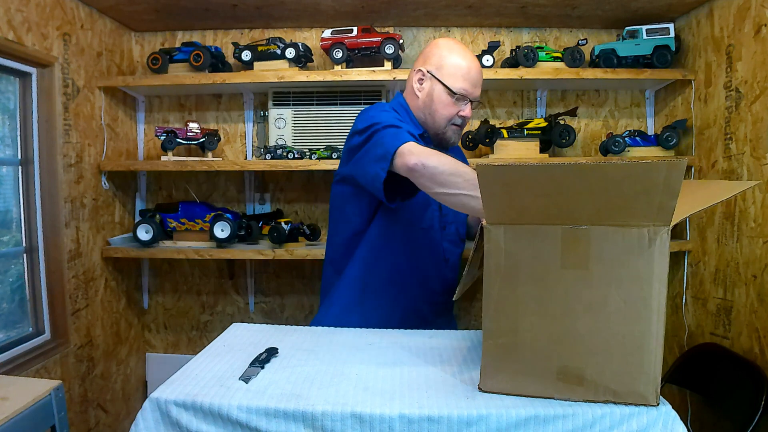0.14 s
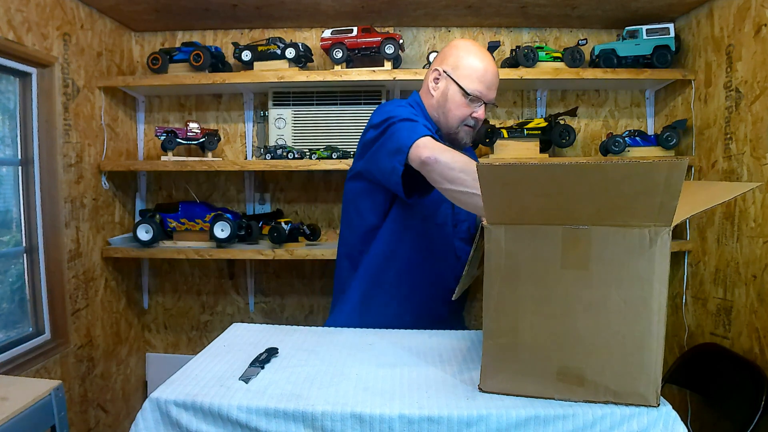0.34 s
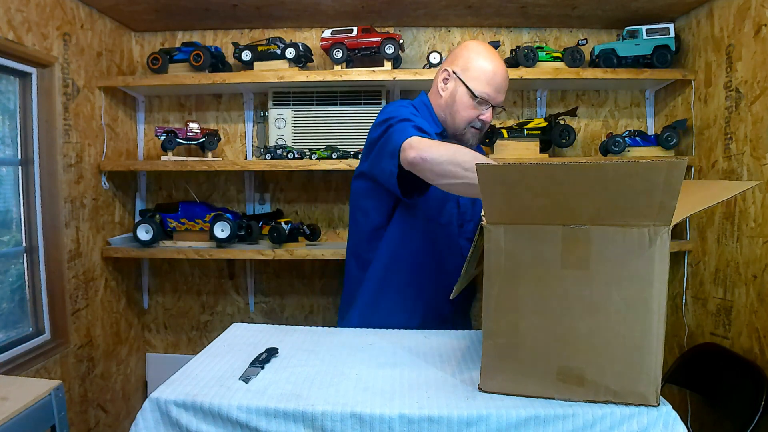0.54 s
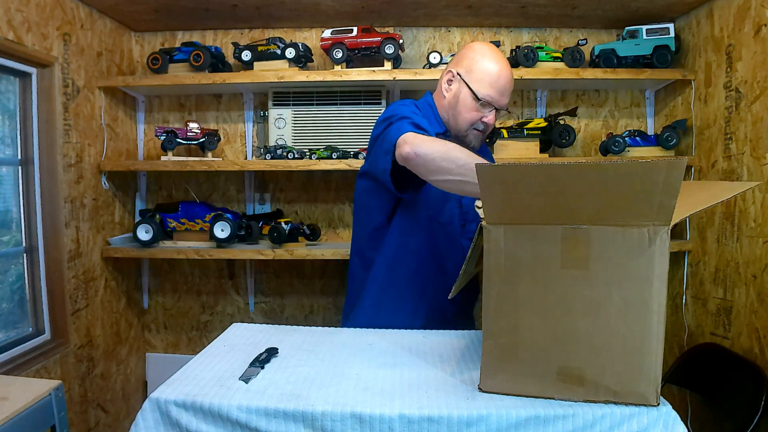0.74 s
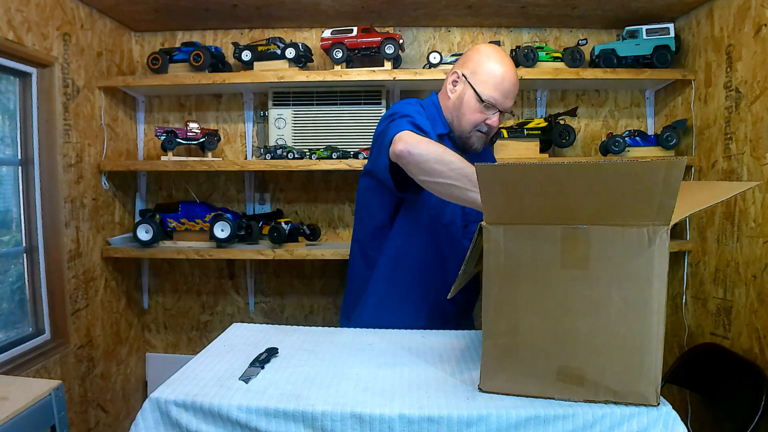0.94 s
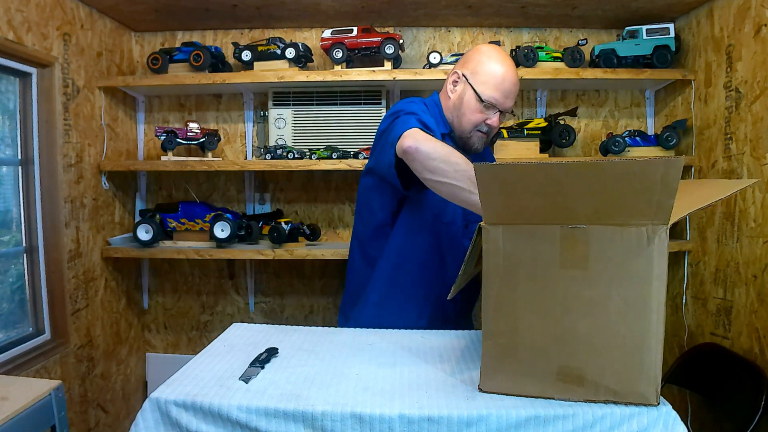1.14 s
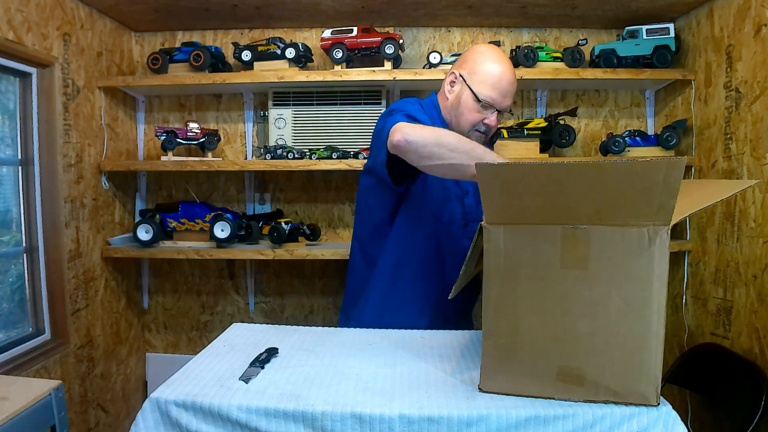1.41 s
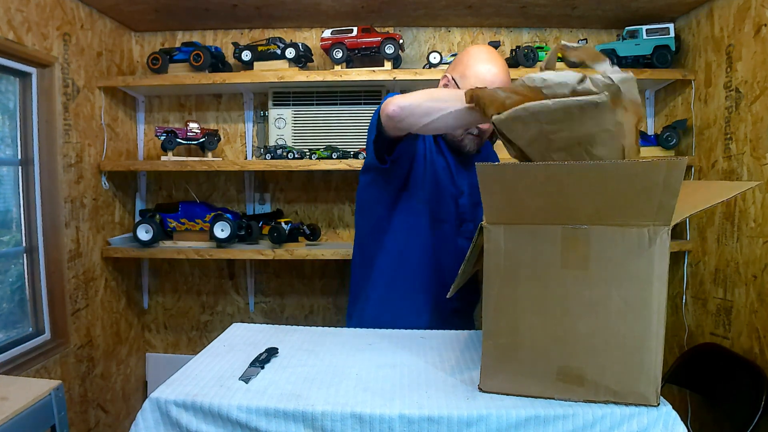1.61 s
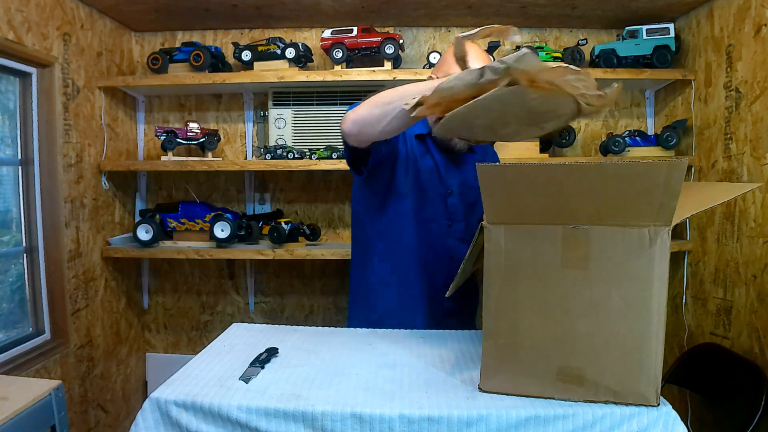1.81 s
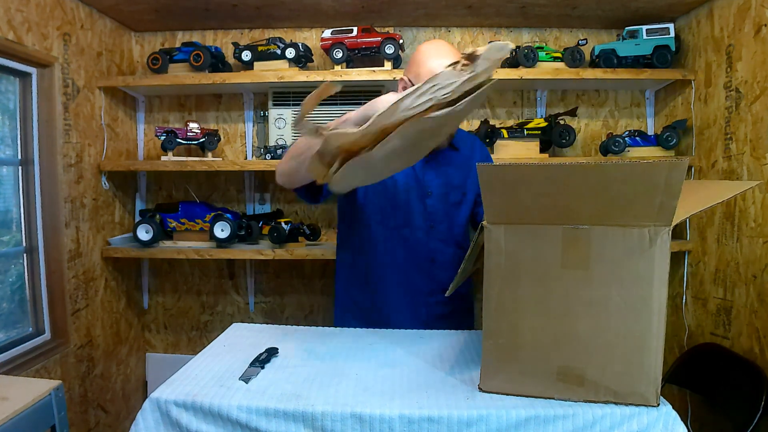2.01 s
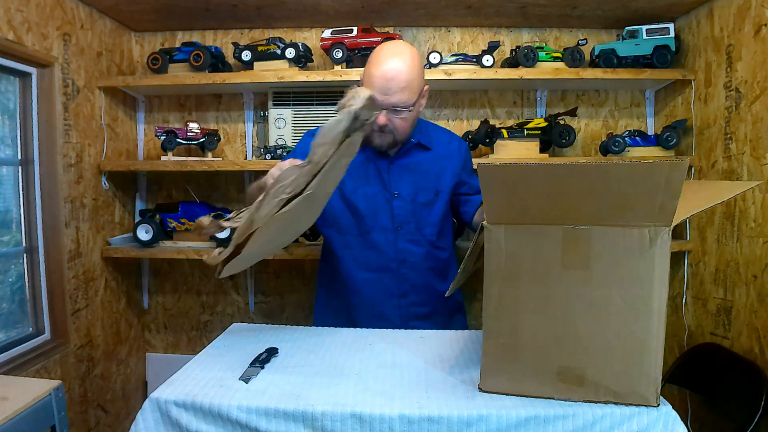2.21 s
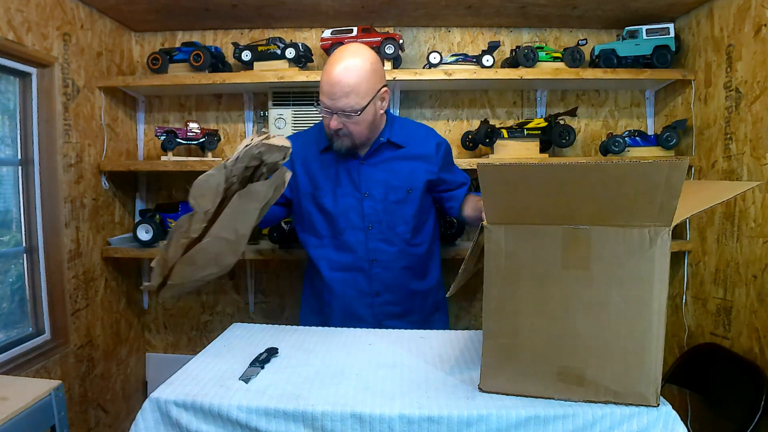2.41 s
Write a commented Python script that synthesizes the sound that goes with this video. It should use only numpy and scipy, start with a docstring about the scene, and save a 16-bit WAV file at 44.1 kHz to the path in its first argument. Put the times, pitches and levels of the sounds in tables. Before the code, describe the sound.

Stiff paper rustling in bursts inside a hollow cardboard box, then a soft box thump

```python
"""In a small wooden room, brown packing paper is gathered inside a cardboard box and dragged out.
Tiny buckling creases, drawn as filtered random clicks, ring in the box; a few noise bursts snap louder.
The loose sheet flaps softly in swells of clicks, one of them heard as a faint low knock, and slaps
together in a dense crackle with a thin hiss. Soft hollow knocks on the box are sums of decaying modes.
One microphone stands some way off."""
import sys
import numpy as np
from scipy import signal
from scipy.fft import rfft, irfft
from scipy.io import wavfile

SR = 44100
rng = np.random.default_rng(int(sys.argv[2]) if len(sys.argv) > 2 else 0)


def waveform_to_disk(signal):
    """Save audio, clipped to [-1, 1], as 16-bit WAV at the path in sys.argv[1]."""
    frames = np.transpose(np.atleast_2d(signal))
    scaled = np.clip(frames, -1, 1) * 32767
    samples = np.round(scaled).astype(np.int16)
    wavfile.write(sys.argv[1], SR, samples)


N = 112454


def amp(db):
    """Level definition: a gain is ten to the power of decibels over twenty."""
    return 10 ** (np.asarray(db) / 20)


def unit(x):
    """Normalisation: equal mean power, scaled to rms 1."""
    return x / np.sqrt(np.mean(x ** 2) + 1e-20)


def read(points, hz):
    """Interpolation of a spectrum along a logarithmic frequency axis."""
    f, value = np.transpose(points)
    return np.interp(np.log(hz + 1), np.log(f + 1), value)


def add(mix, s, sound):
    """Superposition: a sound is summed into the mix from time s."""
    part = mix[max(round(s * SR), 0):][:len(sound)]
    part += sound[:len(part)]


def bins(size=8192):
    """Discrete Fourier frequencies on which the colours are drawn."""
    return np.fft.rfftfreq(size, 1 / SR)


def colour(x, db):
    """Minimum-phase filtering: folding the cepstrum makes a causal filter with the given dB at each bin."""
    cepstrum = irfft(np.log(amp(np.maximum(db, db.max() - 100))))
    half = len(cepstrum) // 2
    cepstrum[1:half] *= 2
    cepstrum[half + 1:] = 0
    response = irfft(np.exp(rfft(cepstrum)))[:half]
    return signal.fftconvolve(x, response)[:len(x)]


def above(hz, edge_hz, order=6):
    """Crossover: a smooth weight that rises from 0 to 1 across the edge."""
    return 1 - 1 / (1 + (hz / edge_hz) ** order)


def resonance_db(hz, width_hz, lift_db):
    """Resonance: a bell in dB, with half its lift at the edges of its width."""
    return lift_db / (1 + (2 * (bins() - hz) / width_hz) ** 2)


def tint(depth_db, count=26):
    """Random radiation: the chance colour of one facet of paper."""
    return read(np.c_[np.geomspace(150, 11000, count), depth_db * rng.standard_normal(count)], bins())


def creases(size, per_s):
    """Random pulse process: the buckling creases are many tiny clicks and a few large ones."""
    spread_db = 4.5
    chance, strength, sign = rng.random((3, size))
    level_db = spread_db * np.minimum(-np.log(1 - strength), 3.8)
    return (chance < per_s / SR) * np.sign(sign - .5) * amp(level_db)


def echoes(room_db, size=16384):
    """Reverberation: direct sound, quick box echoes, then the decaying room; new for each place."""
    # Decay of the room. Each row: frequency in Hz, t60 in seconds.
    room_decay = [(100, 0.38), (400, 0.25), (1000, 0.37), (3000, 0.31), (10000, 0.16)]
    box_echo_db, box_decay_s = 2.5, 0.008
    t = np.arange(size) / SR
    sparse = rng.random((2, size)) < 3000 / SR
    taps = rng.standard_normal((2, size)) * sparse * (t > .001)
    near = taps[0] * np.exp(-t / box_decay_s)
    # the room fades at its own rate in each band
    hz, at, z = signal.stft(taps[1] * (t > .005), SR, nperseg=256)
    fade = amp(-60 * at / read(room_decay, hz)[:, None])
    far = signal.istft(z * fade, SR, nperseg=256)[1][:size]
    out = (t == 0) + amp(box_echo_db) * near / np.linalg.norm(near) + amp(room_db) * far / np.linalg.norm(far)
    return out / np.linalg.norm(out)


def burst(drive, colour_db, room_db, span_s):
    """Energy scaling: a coloured burst in the room, with the energy of 0 dB held for span_s."""
    sound = colour(signal.fftconvolve(drive, echoes(room_db)), colour_db)
    return sound / np.linalg.norm(sound) * np.sqrt(span_s * SR)


def room_tone():
    """Stationary filtered noise: the faint steady air of the room."""
    # Spectrum of the air. Each row: frequency in Hz, relative level in dB.
    air = [(20, 2), (35, -12), (70, -11.5), (215, -22.5), (475, -25.5), (800, -28.5), (1250, -30.5),
           (2000, -39), (3200, -43), (6000, -44.5), (8000, -48), (11000, -46.5)]
    level_db = -68.5
    spectrum = rfft(rng.standard_normal(N)) * amp(read(air, np.fft.rfftfreq(N, 1 / SR)))
    return amp(level_db) * unit(irfft(spectrum, N))


def flaps():
    """Resonant bursts: short swells of clicks with one ring each, as flaps and one faint low knock."""
    # Flaps of the loose sheet, and one faint low knock (at 1.976 s). Each row: start in seconds,
    # level in dB, treble lift in dB, time scale of the swell in seconds, pitch of the ring in Hz,
    # lift of that ring in dB.
    flap_rows = [(0.0, -77.5, 4, 0.0034, 1250, 7), (1.815, -54.5, -0.5, 0.0069, 1415, 18),
                 (1.839, -47, -4.5, 0.0032, 820, 21), (1.893, -58.5, -1.5, 0.0061, 1207, 19),
                 (1.954, -61, 8.5, 0.0074, 900, 5.5), (1.976, -71, -10, 0.0087, 376, 31),
                 (2.329, -68, -7.5, 0.0083, 1390, 14.5), (2.422, -72.5, 12.5, 0.0044, 2840, 16)]
    # Colour shared by these bursts. Each row: frequency in Hz, relative level in dB.
    sheet = [(60, -31), (300, -11.5), (550, -12), (820, -2.5), (1300, -4), (1800, -11), (2400, -10),
             (3200, -27.5), (4300, -15.5), (5000, -26.5), (5900, -13.5), (7500, -39), (11000, -47)]
    ring_width_hz, treble_edge_hz, tint_db, room_db, span_s = 210, 3330, 3.5, -6, 0.027
    out, t = np.zeros(N), np.arange(4096) / SR
    for s, db, treble_db, swell_s, ring_hz, ring_db in flap_rows:
        sheet_db = read(sheet, bins()) + treble_db * above(bins(), treble_edge_hz)
        colour_db = sheet_db + resonance_db(ring_hz, ring_width_hz, ring_db) + tint(tint_db)
        swell = t ** 2 * np.exp(-(t / swell_s) ** 0.99)
        add(out, s, amp(db) * burst(creases(len(t), 3000) * swell, colour_db, room_db, span_s))
    return out


def paper_db(detune=0):
    """Cavity resonance: the open box colours the paper; detune is a relative shift of its resonances."""
    # Colour of the paper. Each row: frequency in Hz, relative level in dB.
    paper = [(40, -39.5), (100, -25.5), (150, -13), (200, -15.5), (300, -4.5), (400, -2.5), (630, -4),
             (950, -5.5), (1270, 3), (1750, -10.5), (2400, -11.5), (3050, -22), (3900, -14.5),
             (5000, -17.5), (5900, -17), (6700, -26), (7500, -38.5), (8800, -34.5), (11000, -41.5)]
    # Resonances of the open box. Each row: frequency in Hz, width in Hz, lift in dB.
    hollow = [(155, 7.3, 2), (387.8, 17, 5.5), (535, 24, 0), (636, 41, 8.5), (838, 180, 4), (1020, 17, 7),
              (1257, 95, 0), (1390, 150, 0)]
    lifts = [resonance_db(hz * (1 + detune), width_hz, lift_db) for hz, width_hz, lift_db in hollow]
    return read(paper, bins()) + sum(lifts)


def sway(hold_s):
    """Low-rate random process: a slow drift between chance values hold_s apart."""
    return np.interp(np.arange(N) / SR / hold_s, np.arange(256), rng.standard_normal(256))


def crackle(count=14):
    """Incoherent sources: facets with their own colour and echoes take turns at crackling and sliding."""
    creases_per_s, slide_share, tint_db, room_db = 1900, 0.24, 3.5, 3.5
    swing_db, hold_s, box_shift = 2, .07, 0.021
    share = amp([swing_db * sway(hold_s) for _ in range(count)])
    facets = []
    for detune in np.linspace(-box_shift, box_shift, count):
        drive = unit(creases(N, creases_per_s / count)) + slide_share * rng.standard_normal(N)
        facet = colour(drive, paper_db(detune) + tint(tint_db))
        facets.append(unit(signal.oaconvolve(facet, echoes(room_db))[:N]))
    return (share * facets).sum(0) / np.linalg.norm(share, axis=0)


def rustle():
    """Crackling noise in bands: broad folds give the bass, small creases the treble."""
    # Handling of the paper, one table per move. Each row: time in seconds, then the levels in dB
    # of the middle, the bass and the treble, before the trim of each band.
    grab = [(0.17, -98, -96, -104), (0.212, -39, -63, -47), (0.24, -40, -56, -54.5),
            (0.278, -48, -62.5, -57.5), (0.314, -54.5, -52, -62.5), (0.335, -51.5, -69, -58)]
    gather = [(0.344, -50, -62, -52), (0.369, -38.5, -39.5, -45), (0.393, -32.5, -36, -47),
              (0.417, -34.5, -37, -40.5), (0.461, -39, -47, -48), (0.469, -36.5, -39.5, -49),
              (0.528, -38.5, -51.5, -41), (0.561, -39, -46, -46), (0.575, -38, -47.5, -46),
              (0.613, -39, -49, -45.5), (0.673, -37, -43, -47), (0.705, -42, -53.5, -51),
              (0.762, -38, -41, -47), (0.789, -44.5, -44, -52), (0.885, -44, -64, -59)]
    tug = [(0.9, -48.5, -59, -56.5), (0.929, -40, -45.5, -47), (0.964, -36, -51, -50),
           (0.995, -35, -44, -44.5), (1.029, -35, -43.5, -48), (1.059, -46, -63, -53),
           (1.096, -43.5, -40, -57), (1.115, -56, -51, -62), (1.14, -57, -61, -72.5)]
    drag = [(1.175, -49.5, -49, -59), (1.186, -35.5, -60, -45.5), (1.245, -35.5, -44, -46.5),
            (1.277, -34.5, -38.5, -45.5), (1.317, -35, -41.5, -47.5), (1.335, -40, -57, -51.5),
            (1.385, -35, -47.5, -52), (1.443, -36, -45, -46.5), (1.479, -39.5, -46, -53),
            (1.497, -38, -52.5, -51), (1.536, -35, -43, -48), (1.595, -40, -45, -48.5),
            (1.631, -46.5, -51, -55.5)]
    lift = [(1.637, -52, -40.5, -50), (1.66, -45, -44, -52.5), (1.672, -34, -49.5, -51.5),
            (1.722, -44.5, -51, -48.5), (1.75, -55, -66, -58.5), (1.774, -43.5, -60, -54.5),
            (1.81, -69, -70.5, -73.5)]
    # Gain of the highest treble. Each row: time in seconds, gain in dB.
    fizz_gain = [(.22, -6), (.31, -2), (.38, 6), (.48, 0.5), (.7, 5), (.88, -1), (1.02, 2), (1.09, -7.5),
                 (1.2, 3.5), (1.36, -2), (1.47, -2), (1.59, 5.5), (1.75, 5.5)]
    trims_db = [-1.5, -0.7, -0.24]  # middle, bass, treble
    bass_edge_hz, treble_edge_hz, fizz_edge_hz, settle_db_per_s = 478, 2010, 6660, 271.5

    sound = rfft(crackle())
    hz, t = np.fft.rfftfreq(N, 1 / SR), np.arange(N) / SR
    s, *levels = np.transpose(np.vstack([grab, gather, tug, drag, lift]))
    # the level falls away before the first row and after the last
    rest_db = -settle_db_per_s * abs(t - np.clip(t, s[0], s[-1]))
    low, high = above(hz, bass_edge_hz), above(hz, treble_edge_hz)
    out = np.zeros(N)
    for band, level, trim_db in zip([low - high, 1 - low, high], levels, trims_db):
        level_db = np.interp(t, s, level) + trim_db + rest_db
        out += unit(irfft(sound * band, N)) * amp(level_db)
    fizz = irfft(rfft(out) * above(hz, fizz_edge_hz, order=24), N)
    return out + fizz * (amp(np.interp(t, *np.transpose(fizz_gain))) - 1)


def snaps():
    """Snap-through buckling: a stiff crease gives way at once, a broad fold low, a small one high."""
    # Single loud creases. Each row: start in seconds, level in dB, pitch in Hz,
    # fall to either side of the pitch in dB per octave.
    snap_rows = [(0.209, -46.5, 2400, 0), (0.224, -42.5, 770, 6), (.260, -55.5, 4350, 16),
                 (.302, -54.5, 4170, 39), (.329, -52.5, 3930, 21), (.359, -39, 414, 21.5),
                 (.380, -36, 345, 18.5), (.394, -31.5, 420, 6.5), (.406, -33, 1300, 4),
                 (.420, -42.5, 4400, 6), (.487, -35, 1410, 0), (.533, -33, 1300, -1.5),
                 (.572, -37.5, 690, 23), (.654, -41, 1230, 10), (0.713, -42, 810, 22),
                 (.984, -31.5, 1080, 8), (.993, -42.5, 4700, 7.5), (1.032, -46.5, 5650, 8.5),
                 (1.178, -41.5, 1300, 7), (1.187, -37, 4220, 3.5), (1.22, -49, 3650, 21.5),
                 (1.284, -54.5, 4500, 10), (1.319, -36, 1220, 10), (1.348, -35.5, 1280, 7),
                 (1.394, -40.5, 1250, 4), (1.495, -46.5, 4200, 15.5), (1.527, -37.5, 500, 4),
                 (1.638, -35.5, 830, 21.5), (1.666, -40, 785, 10), (1.732, -44.5, 1470, 10),
                 (1.768, -47.5, 1400, 3)]
    decay_s, span_s, room_db = 0.00071, 0.01, -3
    out, t = np.zeros(N), np.arange(1024) / SR
    for s, db, hz, slope_db in snap_rows:
        colour_db = paper_db() - slope_db * abs(np.log2((bins() + 1) / hz))
        drive = rng.standard_normal(len(t)) * np.exp(-t / decay_s)
        add(out, s, amp(db) * burst(drive, colour_db, room_db, span_s))
    return out


def knocks():
    """Modal excitation: soft blows ring the box, and a longer contact favours its low modes."""
    # Soft blows on the box. Each row: start in seconds, level in dB, contact time in seconds.
    blows = [(0.366, -52, .0007), (0.391, -48.5, 0.0013), (0.766, -65, 0.0025), (0.974, -58, 0.0017),
             (1.018, -43, .002), (1.088, -48.5, .0012), (1.197, -43, 0.0019), (1.715, -50.5, 0.0022),
             (2.070, -34, 0.00065), (2.081, -31.5, 0.0012), (2.093, -31, 0.0018), (2.135, -40, 0.0042),
             (2.22, -55, 0.0051)]
    # Modes of the cardboard walls and the air between them. Each row: frequency in Hz,
    # level in dB before the contact weakens it, t60 in seconds.
    modes = [(49.6, -11.5, 0.24), (114, -7, 0.13), (165.6, 4, 0.1), (266.5, -10.5, 0.12),
             (291.3, -1.5, 0.097), (392, -23, 0.18), (441.4, -13.5, 0.15), (529, -12, 0.15),
             (607, -13.5, 0.046)]
    rise_s, scuff_gain_db, scuff_decay_s = 0.0081, 5.5, 0.02
    scuff_spectrum = [(60, -5.0), (300, 9.5), (600, -16.5), (1200, -12), (4000, -43)]  # Hz, relative dB
    out, t = np.zeros(N), np.arange(SR // 2) / SR
    for s, db, contact_s in blows:
        ring = np.zeros(len(t))
        for hz, mode_db, t60 in modes:
            ring += amp(mode_db - 60 * t / t60) * np.sin(2 * np.pi * hz * t) / (1 + (hz * contact_s) ** 2)
        scuff_db = read(scuff_spectrum, bins()) - 20 * np.log10(1 + (bins() * contact_s) ** 2)
        scuff = colour(rng.standard_normal(len(t)) * np.exp(-t / scuff_decay_s), scuff_db)
        add(out, s, amp(db) * (ring + amp(scuff_gain_db) * scuff) * (1 - np.exp(-t / rise_s)))
    return out


def slap():
    """Collapse of the swung sheet: dense crackle swells and fades, and a thin resonant hiss lingers."""
    # Colour of the slap. Each row: frequency in Hz, relative level in dB.
    slap_spectrum = [(250, -14.5), (500, -3.5), (1200, 1.5), (1800, -10.5), (2420, -1.5), (3180, -17),
                     (4200, -14), (5900, -12.5), (6900, -39), (11000, -39)]
    at_s, hold_s, level_db, room_db, span_s = 2.129, 0.0082, -47, -15, 0.016
    rise_db_per_s, fall_db_per_s, creases_per_s = 749, 599.5, 9000
    hiss_hz, hiss_half_width_hz, hiss_peak_db = 5680, 220, -73
    hiss_rise_db_per_s, hiss_fall_db_per_s = 398.5, 143

    t = np.arange(N) / SR - at_s
    swell = amp(rise_db_per_s * np.minimum(t, 0) - fall_db_per_s * np.maximum(t - hold_s, 0))
    crush = burst(creases(N, creases_per_s) * swell, read(slap_spectrum, bins()), room_db, span_s)
    hiss_db = -20 * np.log10(1 + ((bins() - hiss_hz) / hiss_half_width_hz) ** 2)
    hiss = unit(colour(rng.standard_normal(N), hiss_db))
    linger = amp(np.minimum(hiss_rise_db_per_s * t, -hiss_fall_db_per_s * t))
    return amp(level_db) * crush[:N] + amp(hiss_peak_db) * hiss * linger


def scene():
    """Superposition: all sources add at one microphone, alike in both channels."""
    mono = room_tone() + flaps() + rustle() + snaps() + knocks() + slap()
    return np.tile(mono, (2, 1))


def record(dry):
    """Band limitation: the recorder passes only what lies below its cutoff."""
    cut_hz = 11200
    low_pass = signal.firwin(401, cut_hz, window=("kaiser", 8), fs=SR)
    return signal.oaconvolve(dry, low_pass[None], "same")


dry = scene()
out = record(dry)
waveform_to_disk(out)
```